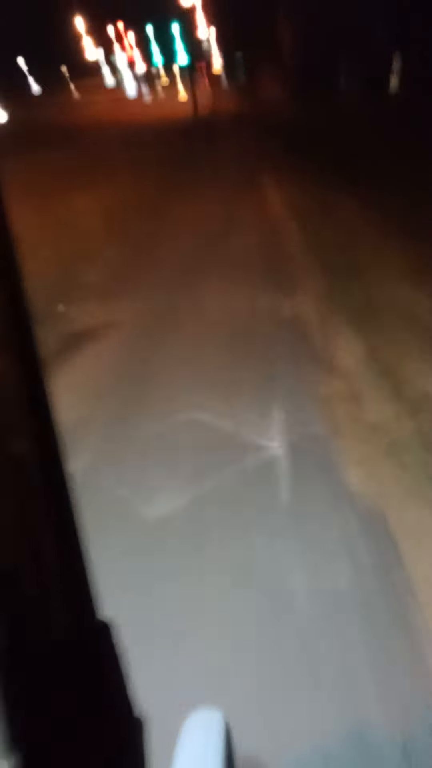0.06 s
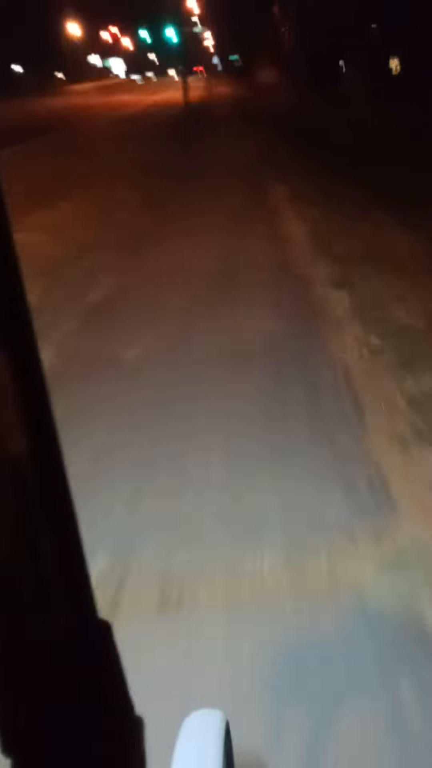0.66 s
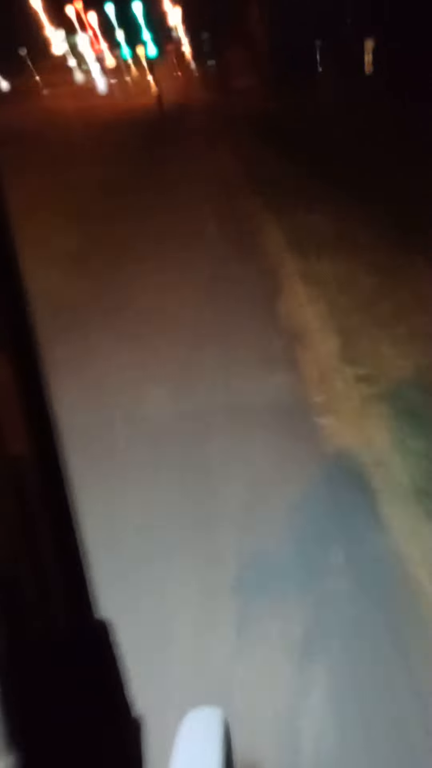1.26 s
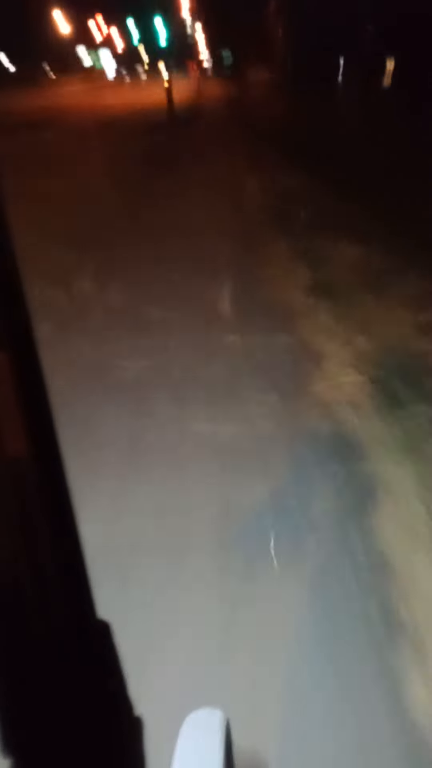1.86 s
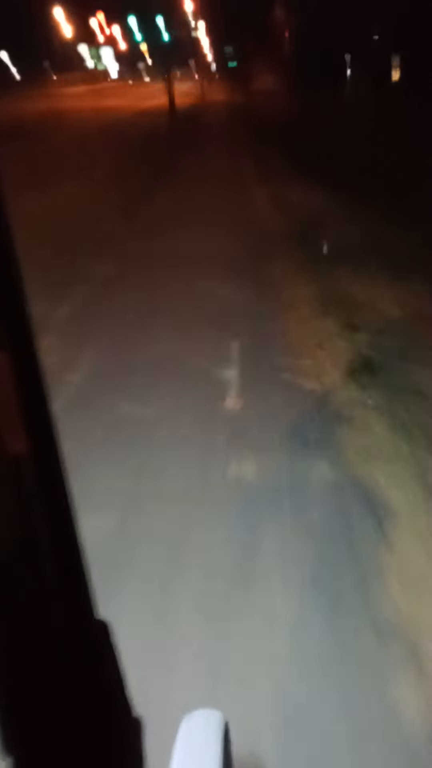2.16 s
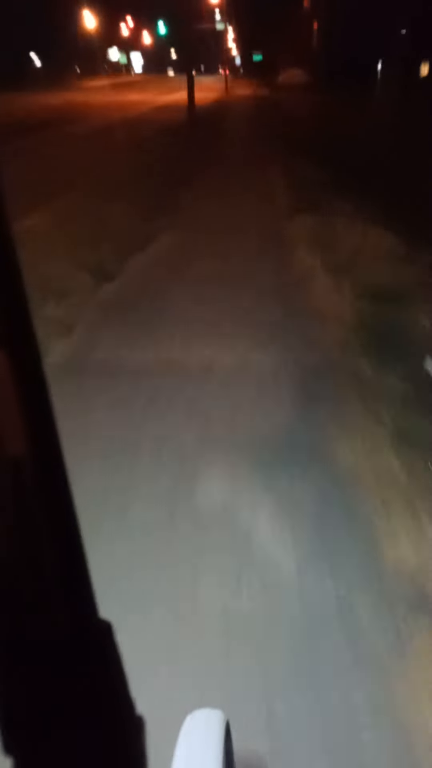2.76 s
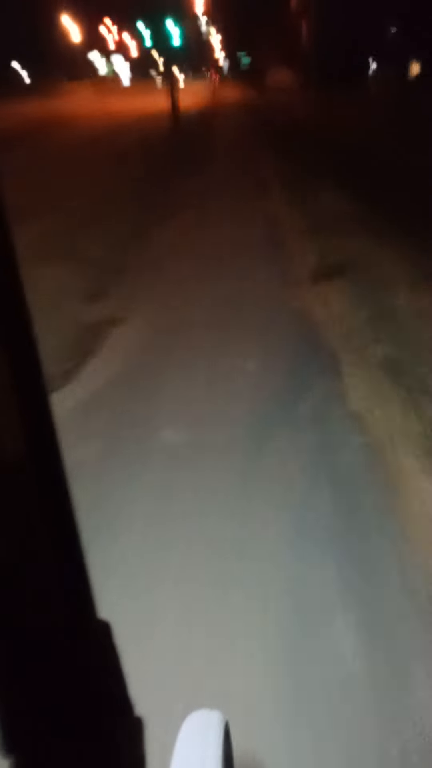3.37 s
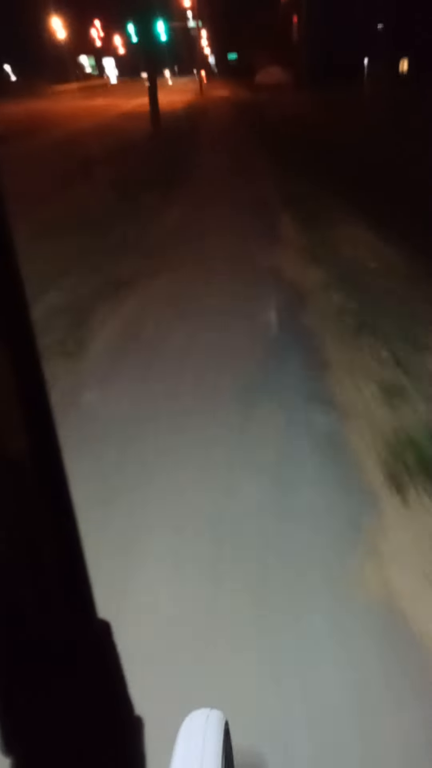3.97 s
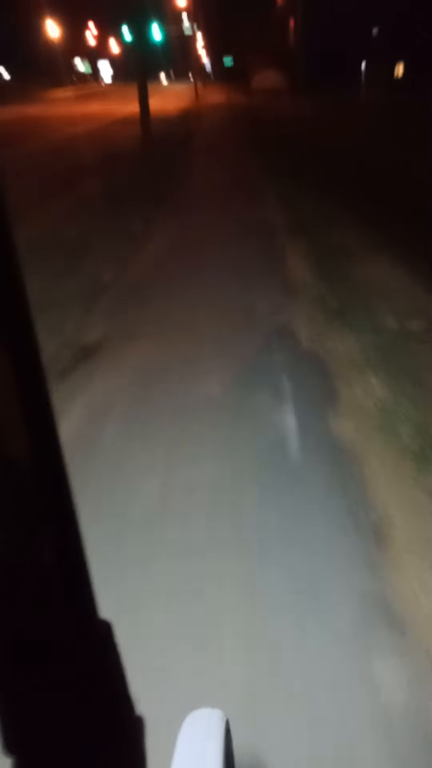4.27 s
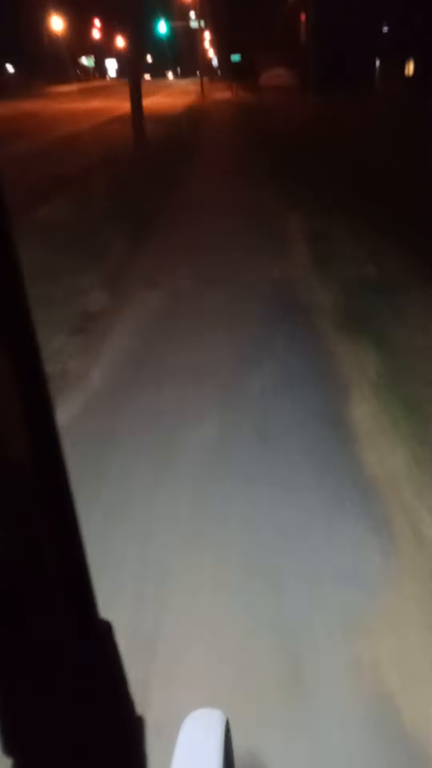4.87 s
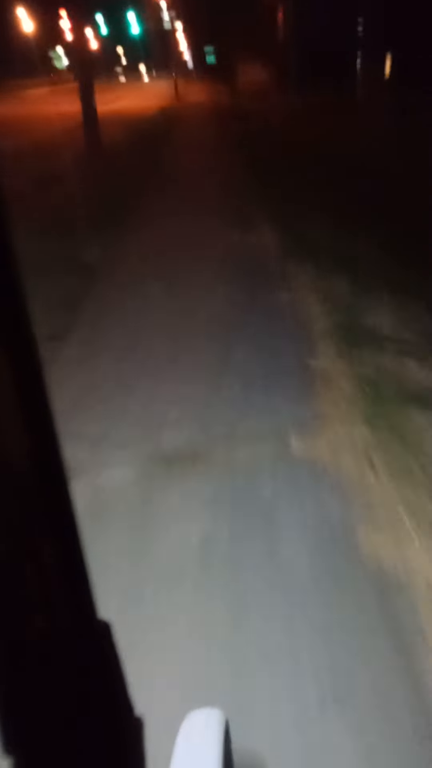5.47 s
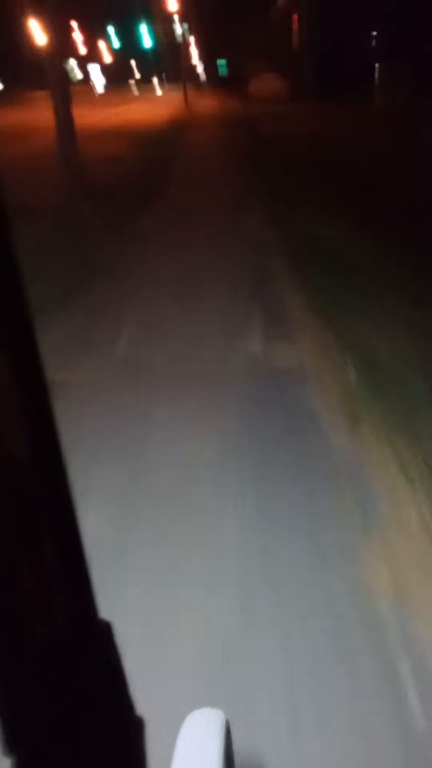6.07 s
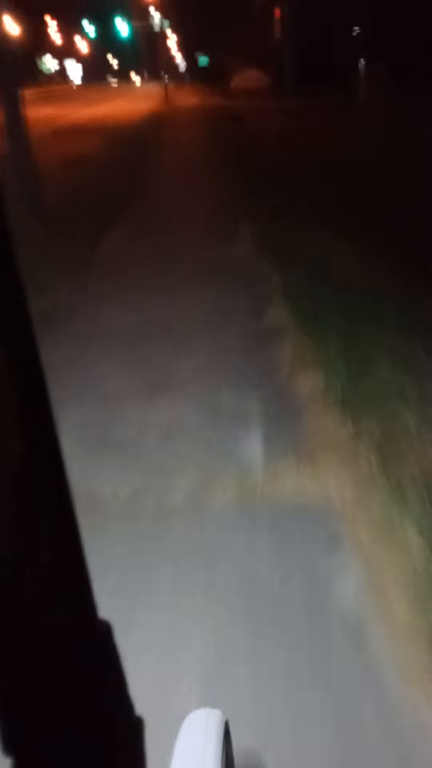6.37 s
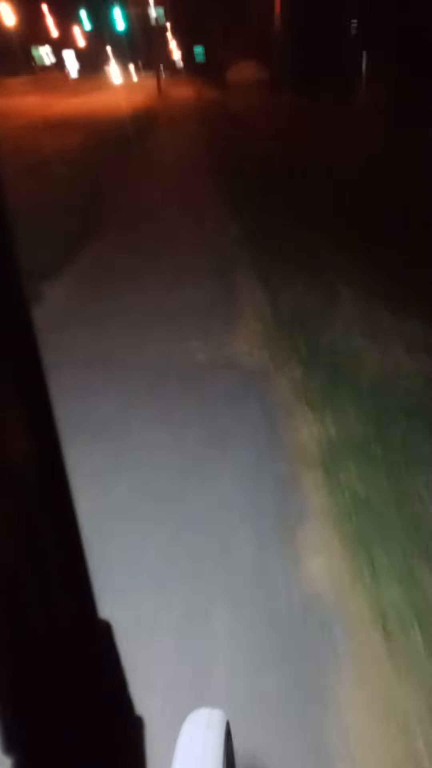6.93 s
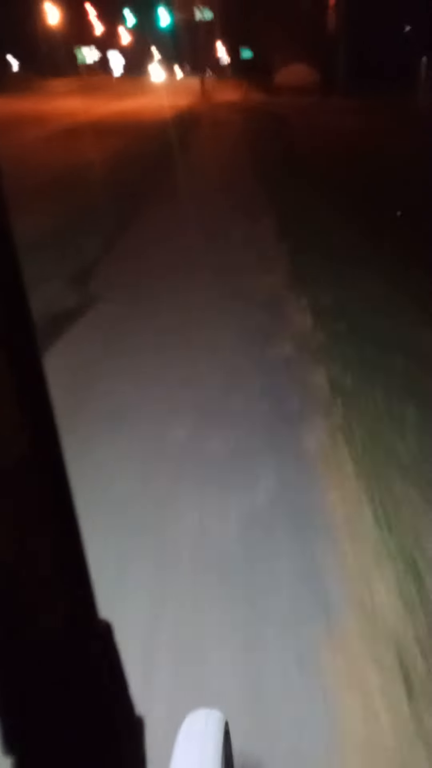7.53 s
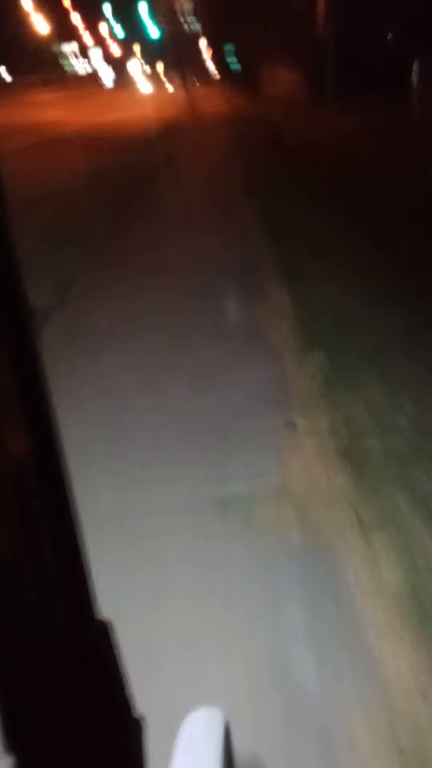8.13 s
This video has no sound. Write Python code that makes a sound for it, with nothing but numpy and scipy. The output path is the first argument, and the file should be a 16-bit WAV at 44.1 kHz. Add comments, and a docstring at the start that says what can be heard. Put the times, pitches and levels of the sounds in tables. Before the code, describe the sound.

Light metallic jingling, ticks and knocks from a moving bicycle, with one hard clack early on and passing cars that fade away.

```python
"""A bicycle rolls along a paved path beside a road at night, heard from the handlebar.
Its tyres rumble and thump over joints, the chain ticks, loose fittings tap, clink and knock,
a spring buzzes and a thin metal disc pings and shivers very high: each part rings in damped modes.
Cars pass and fade, their tyre roar combed by the bounce off the road.
One hard clack of the recorder in its holder makes a limiter duck everything briefly."""
import sys
import numpy as np
from scipy import signal
from scipy.fft import rfft, irfft
from scipy.io import wavfile
from scipy.ndimage import uniform_filter1d, minimum_filter1d

SR = 44100
rng = np.random.default_rng(int(sys.argv[2]) if len(sys.argv) > 2 else 0)


def wrap_up_sound(samples):
    """Save the sound to the file named by the first command line argument, as 16-bit audio."""
    columns = np.atleast_2d(samples).T
    # keep every value between -1 and 1, then stretch to whole-number steps
    tamed = np.clip(columns, -1, 1)
    steps = np.round(tamed * 32767).astype(np.int16)
    wavfile.write(sys.argv[1], SR, steps)


N = 361619
T = np.arange(N) / SR
LEAD_IN_SAMPLES = 256  # ahead of each hit
LEAD_IN_S = LEAD_IN_SAMPLES / SR


def undb(db):
    """Decibels to gain."""
    return 10 ** (np.asarray(db) / 20)


def unit(x):
    """Scale to rms 1."""
    return x / np.sqrt(np.mean(x ** 2))


def curves(rows):
    """Columns of a timed table, interpolated linearly."""
    times_s, *columns = np.transpose(rows)
    return [np.interp(T, times_s, column) for column in columns]


def add(out, time_s, x):
    """Mix x into out from time_s."""
    i = max(int(time_s * SR), 0)
    out[i:i + len(x)] += x[:max(N - i, 0)]


def walk(rate_hz):
    """Smooth random drift; rms 1."""
    step = max(int(SR / rate_hz), 1)
    stairs = np.repeat(rng.standard_normal(N // step + 1), step)
    return unit(uniform_filter1d(uniform_filter1d(stairs, step), step)[:N])


def hump(peak_s, width_s):
    """Gaussian swell to 1."""
    return np.exp(-((T - peak_s) / width_s) ** 2)


def colour(x, spectrum):
    """Shape x by (frequency [Hz], gain [dB]) points; rms 1."""
    hz, db = np.transpose(spectrum)
    bins_hz = np.maximum(np.fft.rfftfreq(N, 1 / SR), 1)
    gain = undb(np.interp(np.log(bins_hz), np.log(hz), db))
    return unit(irfft(rfft(x) * gain, N))


def ridge(centre_hz, width_hz):
    """Noise band with a moving centre; rms 1."""
    lowpass = signal.butter(2, width_hz / 2, fs=SR, output="sos")
    baseband = signal.sosfilt(lowpass, rng.standard_normal(N) + 1j * rng.standard_normal(N))
    return unit(np.real(baseband * np.exp(2j * np.pi * np.cumsum(centre_hz) / SR)))


def ring(modes, scatter_db, detune, weight_db=0, size=2048):
    """Damped modes of a part; each blow lands elsewhere and reweights them."""
    hz, width_hz, db = np.transpose(modes)[:, :, None]
    scatter, shift = rng.standard_normal((2, len(modes), 1))
    t = np.arange(size) / SR
    sign = (-1) ** np.arange(len(modes))[:, None]
    gain = sign * undb(db + weight_db + scatter_db * scatter) * np.sqrt(width_hz)
    decay = np.exp(-np.pi * width_hz * t)
    return np.sum(gain * decay * np.sin(2 * np.pi * hz * (1 + detune * shift) * t), axis=0)


def strike(body, buzz, buzz_s, lead_in=0.26, lead_in_rise_s=0.0021, size=2048):
    """A faint rising lead-in, the hit and a dying buzz; energy of 5 ms at rms 1."""
    t = (np.arange(size) - LEAD_IN_SAMPLES) / SR
    lead_in_noise = lead_in * np.exp(-np.abs(t) / lead_in_rise_s) / np.sqrt(SR * lead_in_rise_s)
    rebounds = buzz * np.exp(-np.abs(t) / buzz_s) / np.sqrt(SR * buzz_s)
    force = np.where(t < 0, lead_in_noise, rebounds) * rng.standard_normal(size) ** 3
    force[LEAD_IN_SAMPLES] = 1
    hit = signal.fftconvolve(force, body)
    return hit / np.sqrt(np.sum(hit ** 2) / (0.005 * SR))


# Bicycle tyre rumble (frequency [Hz], gain [dB])
RUMBLE_SPECTRUM = [(25, -34), (40, -15), (75, 0), (130, 0.5), (250, -9.5), (340, -10.5), (430, -20),
                   (720, -20.5), (1500, -39.5), (2500, -93)]
# Thumps over joints (time [s], pitch [Hz], half length [s], peak [dB])
THUMPS = [(0.079, 124, 0.0055, -25.5), (.386, 228, 0.003, -18.5), (1.427, 81.8, 0.014, -36.5),
          (4.019, 120.4, 0.014, -34.5)]


def tyres(fade_db_per_s=0.32):
    """Rolling rumble; joints send short, soft blows through the frame."""
    rumble_db = -47.5 - fade_db_per_s * T + 4.4 * np.tanh(walk(16))
    out = undb(rumble_db) * colour(rng.standard_normal(N), RUMBLE_SPECTRUM)
    for time_s, hz, half_s, db in THUMPS:
        envelope = np.exp(-np.abs((T - time_s) / half_s) ** 3.1)
        out += undb(db) * envelope * np.cos(2 * np.pi * hz * (T - time_s))
    return out


def road_bounce(x, spacing_hz, echo, wander=0.02, bounces=1, abreast_s=3.0, passing_s=2.3):
    """Reflections comb x; the ridges close to spacing_hz as the car nears, then spread."""
    distance = np.hypot(1, (T - abreast_s) / passing_s)  # 1 when abreast
    lag_s = (1 + wander * walk(2.94)) / (spacing_hz * distance)
    echoes = sum(echo ** k * np.interp(T - k * lag_s, T, x) for k in range(1, bounces + 1))
    return unit(x + echoes)


# Car tyre roar (time [s], relative level [dB])
ROAR_LEVELS = [(0, -48), (.5, -46.5), (2.3, -45.5), (3.7, -51.5), (5.3, -56), (6, -68.5), (8.2, -60.5)]
# Its spectrum (frequency [Hz], gain [dB])
ROAR_SPECTRUM = [(250, -2.5), (450, -5), (580, 1.5), (760, -8), (860, -4), (1120, 4.5), (1500, 5.5),
                 (1850, 4), (2200, -6.5), (3200, -22), (4100, -18.5), (10000, -48)]


def car_roar(gain_db=-2.5):
    """Broad, wavering tyre noise, faintly combed."""
    level_db, = curves(ROAR_LEVELS)
    envelope = undb(level_db + gain_db + 2.3 * walk(12))
    noise = colour(rng.standard_normal(N), ROAR_SPECTRUM)
    return envelope * road_bounce(noise, spacing_hz=417, echo=0.033)


def tread_whine(pitch_hz=1010, throb_hz=2.807, throb_db=7, end_s=2.39):
    """The tread of the approaching car throbs, fading out as it arrives."""
    swell_db = -52.5 + 5.5 * hump(peak_s=1.52, width_s=0.33)
    throb = np.cos(2 * np.pi * throb_hz * (T - 0.02))
    fade = np.clip(2 * (end_s - T), 0, 1)
    return undb(swell_db + throb_db * throb) * fade * ridge(pitch_hz + 22 * walk(16), width_hz=75)


# Lower band of car tyre noise (time [s], centre [Hz], level [dB])
LOWER_BAND = [(2.5, 791, -68), (2.9, 825, -44.5), (2.99, 862, -47.5), (3.1, 919, -39.5), (3.22, 932, -41.5),
              (3.42, 963, -49.5), (3.8, 1084, -50.5), (5.3, 1296, -86)]
# Upper band (time [s], centre [Hz], blur [Hz], level [dB])
UPPER_BAND = [(0, 1968, 52, -49), (.45, 1870, 74, -47), (.9, 1773, 228, -49.5), (2.2, 1276, 212, -57.5),
              (2.6, 1248, 18, -44), (2.8, 1250, 69, -48), (3.4, 1354, 205.4, -64), (4.05, 1395, 156, -51),
              (5.2, 1579, 176, -58), (6, 1654, 220, -80)]


def car_bands():
    """Two bands of tyre noise: the upper sinks as the car nears, both rise as it leaves."""
    lower_hz, lower_db = curves(LOWER_BAND)
    upper_hz, blur_hz, upper_db = curves(UPPER_BAND)
    lower = undb(lower_db + walk(20)) * ridge(lower_hz + 28 * walk(16), width_hz=156)
    upper = undb(upper_db + walk(13)) * ridge(upper_hz + blur_hz * walk(350), width_hz=61)
    return lower + upper


# Hiss of approaching cars (time [s], level [dB])
HISS_LEVELS = [(0, -62), (.45, -53.5), (1.6, -63.5), (2.4, -59.5), (3.6, -87)]


def car_hiss():
    """Deeply combed hiss reaches the path ahead of the car."""
    level_db, = curves(HISS_LEVELS)
    hiss = ridge(2600 + 260 * T, width_hz=1340)
    return undb(level_db) * road_bounce(hiss, spacing_hz=264.7, echo=0.77, wander=0.05, bounces=2)


# Thin ring of links and ticks (frequency [Hz], width [Hz], gain [dB])
TICK_MODES = [(7130, 1050, -11.5), (9570, 780, -6), (12030, 660, 0.5), (15100, 550, -9.5)]
# Grit under the tyres (frequency [Hz], gain [dB])
GRIT_SPECTRUM = [(1500, 8), (2500, 15), (4000, 4.5), (6400, 0.5), (7700, -11), (10000, 4.5), (13300, -4),
                 (15200, 5)]
# Shaking of the bicycle (time [s], level [dB])
SHAKE_LEVELS = [(0, -64.5), (1.9, -58.5), (3, -62.5), (8.2, -63)]


def chain_and_grit(links_per_s=30.6, links_gain_db=6, count=260):
    """Chain links tick unevenly over the teeth; grit crackles beneath."""
    shake_db, = curves(SHAKE_LEVELS)
    links = np.zeros(N)
    for k, (late, force) in enumerate(rng.standard_normal((count, 2))):
        body = ring(TICK_MODES, scatter_db=4, detune=0.04, size=1024)
        link = undb(4 * min(force, 1.5)) * strike(body, buzz=0.9, buzz_s=0.004)
        add(links, (k + 0.2 * late) / links_per_s, link)
    crackle = undb(2 * walk(300) + 3 * walk(70))
    grit = colour(rng.standard_normal(N) * crackle, GRIT_SPECTRUM)
    return undb(shake_db) * (undb(links_gain_db) * links + grit)


# Dull ring of a loose fitting (frequency [Hz], width [Hz], gain [dB])
FITTING_MODES = [(1300, 920, -5), (2060, 510, 10), (2766, 160, 5.5), (3280, 340, 5.5), (5590, 290, -1.5),
                 (7100, 190, -16), (10700, 390, -12.5)]
# Its tapping (time [s], level [dB])
TAP_LEVELS = [(0, -70), (2.8, -55), (8.2, -50.5)]


def taps(scatter_db=2.0, count=72):
    """A loose fitting taps lightly and unevenly, louder as the ride goes on."""
    out = np.zeros(N)
    for k, (late, force) in enumerate(rng.standard_normal((count, 2))):
        time_s = abs(k + 0.5 * late) / count * N / SR
        db = np.interp(time_s, *np.transpose(TAP_LEVELS)) + scatter_db * min(force, 2)
        body = ring(FITTING_MODES, scatter_db=2.5, detune=0.015, size=1024)
        add(out, time_s, undb(db) * strike(body, buzz=0.05, buzz_s=0.004, lead_in=0.03, size=1024))
    return out


# Small metal parts (frequency [Hz], width before damping factor [Hz], gain [dB])
SMALL_PART_MODES = [(2000, 100, 2), (2400, 120, -7), (3500, 280, 4.5), (3870, 290, 3), (4445, 170, 5),
                    (4770, 820, 5), (5390, 800, 5.5), (6160, 580, 5.5), (6740, 600, 0), (9460, 500, -4),
                    (10150, 290, -3), (14500, 2500, -4)]


def small_part(focus_hz, damping, focus_db=13, focus_octaves=0.14):
    """Ring with the modes near focus_hz favoured; a freer part is damped less."""
    modes = np.array(SMALL_PART_MODES) * [1, damping, 1]
    offset = np.log2(modes[:, :1] / focus_hz) / focus_octaves
    return ring(modes, scatter_db=4.5, detune=0.012, weight_db=focus_db * np.exp(-offset ** 2))


def jingle(level_db=-55, scatter_db=3, bounce_s=0.022, loss_db=3, low_hz=3300, count=100):
    """Small parts hop faintly: three bounces each, softer every time."""
    out = np.zeros(N)
    for k, (late, force, pitch, gap) in enumerate(rng.random((count, 4))):
        time_s = (k + late) / count * N / SR
        db = level_db + scatter_db * (2 * force - 1)
        for hop in range(3):
            body = small_part(low_hz * 2 ** (pitch ** 2), damping=0.4)
            add(out, time_s, undb(db - hop * loss_db) * strike(body, buzz=0.7, buzz_s=0.005, size=1024))
            time_s += bounce_s * (0.5 + gap)
    return out


# Clinks of small parts (time [s], relative level [dB], focus [Hz])
CLINKS = [(0.164, -42, 5700), (0.417, -45, 5800), (0.8187, -39, 6480), (1.1244, -38, 4070),
          (1.138, -39, 6400), (1.721, -35.5, 4600), (2.449, -37, 5090), (2.458, -35.5, 5100),
          (3.0337, -46, 5600), (3.698, -45.5, 4430), (4.442, -39, 5320), (4.9699, -39.5, 4960),
          (5.4556, -41.5, 4960), (5.4733, -43.5, 3400), (5.7612, -32.5, 3440), (6.097, -41, 3500),
          (6.128, -46, 6070), (6.44, -45, 3700), (6.7597, -38, 3620), (6.9902, -36.5, 6900),
          (7.0198, -40, 6200), (7.0478, -46, 6100), (7.0855, -38, 4250), (7.094, -37, 4840),
          (7.678, -44, 5750), (7.8437, -36.5, 3750), (7.8551, -36.5, 6800)]


def clinks(gain_db=2.75):
    """Small metal parts collide and buzz briefly."""
    out = np.zeros(N)
    for time_s, db, focus_hz in CLINKS:
        clink = strike(small_part(focus_hz, damping=0.58), buzz=0.19, buzz_s=0.012, lead_in=0.24)
        add(out, time_s - LEAD_IN_S, undb(db + gain_db) * clink)
    return out


def rattle(spells, modes, contacts_per_s, idle_db, contact_s=0.0015):
    """Random contacts in spells, faint between; soft ones ring the first mode, hard ones all."""
    swell = sum(undb(db) / (1 + ((T - mid_s) / half_s) ** 6) for mid_s, half_s, db in spells)
    swell += undb(idle_db) * np.maximum(walk(30) - 1, 0)
    hardness = np.sqrt(swell / swell.max())
    touching = rng.random(N) < contacts_per_s / SR
    t = T[:SR // 20]
    onset = 1 - np.exp(-(t / contact_s) ** 2)
    out, power = np.zeros(N), 0
    for k, (hz, width_hz, db) in enumerate(modes):
        envelope = undb(db) * np.sqrt(width_hz) * np.exp(-np.pi * width_hz * t) * onset
        body = envelope * np.sin(2 * np.pi * hz * t)
        force = swell * (hardness if k else 1) * touching * rng.standard_normal(N)
        out += signal.fftconvolve(force, body)[:N]
        power += np.sum(body ** 2) * contacts_per_s / SR
    return out / np.sqrt(power)


# Thin metal disc (frequency [Hz], width [Hz], gain [dB])
DISC_MODES = [(11690, 45, 0), (11850, 170, -4), (12395, 90, -4), (13310, 70, -18), (15060, 180, -9)]
# Blows on it (time [s], level [dB])
DISC_PINGS = [(.235, -41), (.8854, -43.5), (1.4856, -31.5), (1.5317, -30), (2.014, -44), (2.669, -29),
              (3.7741, -46), (4.4321, -45), (4.6405, -33.5), (4.9578, -37), (5.952, -36), (6.341, -29),
              (6.9284, -30), (7.5395, -41), (7.8433, -42), (7.967, -35)]
# Spells of shivering (middle [s], half length [s], level [dB])
DISC_SHIVERS = [(0.63, 0.062, -47), (1.499, 0.0067, -35), (1.553, 0.024, -34.5), (1.99, 0.038, -39),
                (2.25, 0.023, -50.5), (2.604, 0.014, -38), (2.66, 0.033, -46.5), (6.222, 0.03, -46),
                (6.3, 0.032, -42), (6.84, 0.053, -51), (6.943, 0.02, -38), (7.925, 0.013, -43.5)]


def disc():
    """The disc shivers against its neighbour; struck, it ticks and rings very high."""
    out = rattle(DISC_SHIVERS, DISC_MODES, contacts_per_s=900, idle_db=-53)
    for time_s, db in DISC_PINGS:
        body = ring(DISC_MODES, scatter_db=3, detune=0.002)
        ping = strike(body, buzz=0.46, buzz_s=0.0031, lead_in=0.032) + undb(-10) * tick()
        add(out, time_s - LEAD_IN_S, undb(db) * ping)
    return out


def tick():
    """One thin, buzzing contact."""
    return strike(ring(TICK_MODES, scatter_db=5, detune=0.02), buzz=0.43, buzz_s=0.0047, lead_in=0.24)


# Ticks of loose parts (time [s], relative level [dB])
TICKS = [(0.325, -48.5), (1.149, -33.5), (2.4551, -47), (3.174, -52.5), (3.305, -46.5), (3.6258, -41.5),
         (3.978, -47), (5.1, -50), (5.664, -51.5), (6.704, -52), (6.9905, -40), (7.004, -47), (7.2823, -45),
         (7.868, -36.5)]


def ticks(gain_db=5):
    """Loose parts touch with single bright ticks."""
    out = np.zeros(N)
    for time_s, db in TICKS:
        add(out, time_s - LEAD_IN_S, undb(db + gain_db) * tick())
    return out


# Knocks of the loose fitting (time [s], relative level [dB])
KNOCKS = [(0.44, -43), (1.001, -43.5), (3.3359, -46.5), (3.356, -52), (3.5808, -43), (3.858, -38.5),
          (4.1503, -41), (4.166, -45.5), (4.4702, -43.5), (5.1078, -47), (5.223, -49.5), (5.7618, -39),
          (5.8855, -46), (6.0746, -42), (6.216, -41.5), (7.013, -46), (7.2198, -46.5), (7.2344, -38.5),
          (7.519, -50.5), (7.7395, -47), (7.8138, -41), (7.867, -50), (7.878, -43)]


def knocks(gain_db=4):
    """The fitting knocks dully; its broad modes die fast."""
    out = np.zeros(N)
    for time_s, db in KNOCKS:
        body = ring(FITTING_MODES, scatter_db=2.0, detune=0.02)
        knock = strike(body, buzz=0.12, buzz_s=0.016, lead_in=0.041, lead_in_rise_s=0.0054)
        add(out, time_s - LEAD_IN_S, undb(db + gain_db) * knock)
    return out


# Light spring (frequency [Hz], width [Hz], gain [dB])
SPRING_MODES = [(4582, 160, 2.5), (4590, 230, 3), (5850, 560, 2)]
# Spells of buzzing (middle [s], half length [s], level [dB])
SPRING_BUZZES = [(1.1, 0.037, -49.5), (1.52, .08, -63.5), (1.8, 0.095, -54.5), (6.26, 0.042, -55)]


def spring():
    """A light spring buzzes over rough patches of path."""
    return rattle(SPRING_BUZZES, SPRING_MODES, contacts_per_s=330, idle_db=-54)


def holder_clack(scrape_db=-28, tilt_pivot_hz=1200):
    """Jolted, the recorder scrapes in its holder, hits the stop and rebounds twice, duller."""
    sliding = np.interp(T, [1.124, 1.126, 1.134, 1.146], [0, 0.95, 0.61, 0.0098])
    scrape_spectrum = [(200, -29), (600, 6.0), (1300, -0.5), (6000, -28), (13000, -14)]
    out = undb(scrape_db) * sliding * colour(rng.standard_normal(N), scrape_spectrum)
    # (frequency [Hz], width [Hz], gain [dB])
    case_modes = np.array([(633, 130, 1), (880, 170, 10), (1200, 370, 6.5),
                           (2570, 360, 7.5), (4580, 630, 0), (10000, 2500, -15)])
    octaves_off = np.abs(np.log2(case_modes[:, :1] / tilt_pivot_hz))
    for time_s, db, tilt_db_per_octave in [(1.1606, -7.5, 4), (1.1801, -9.5, -17), (1.1845, -14, -19)]:
        body = ring(case_modes, scatter_db=1, detune=0.01, weight_db=tilt_db_per_octave * octaves_off)
        add(out, time_s - LEAD_IN_S, undb(db) * strike(body, buzz=0.083, buzz_s=0.0085, lead_in=0.0058))
    # so small a case radiates no bass
    return signal.sosfilt(signal.butter(2, 450, "high", fs=SR, output="sos"), out)


def car_abreast(level_db=-52.5):
    """The low body of the roar, rising in pitch, heard only as the car goes by."""
    centre_hz = 420 + 220 * (T - 3.35)
    return undb(level_db) * hump(peak_s=3.39, width_s=0.4) * ridge(centre_hz, width_hz=120)


# Bicycle frame (frequency [Hz], width [Hz], gain [dB])
FRAME_MODE = (780, 1200, 0)
# Hard jolts (time [s], level [dB])
JOLTS = [(6.9774, -29.5), (7.84, -31.5)]


def jolts():
    """A rough knock rings fitting and frame together and shudders on."""
    out = np.zeros(N)
    for time_s, db in JOLTS:
        body = ring(FITTING_MODES[:4] + [FRAME_MODE], scatter_db=-0.5, detune=0.019)
        add(out, time_s - LEAD_IN_S, undb(db) * strike(body, buzz=0.51, buzz_s=0.028, lead_in=0.089))
    return out


def scene():
    """Mono mix at the handlebar, in open air."""
    impacts = knocks() + clinks() + ticks() + jolts() + taps() + holder_clack()
    rattles = chain_and_grit() + jingle() + disc() + spring()
    cars = car_roar() + tread_whine() + car_bands() + car_hiss() + car_abreast()
    return (impacts + rattles + cars + tyres())[None]


def record(dry, ceiling_db=-11.5, hold_s=0.036, release_s=0.023, cutoff_hz=15950):
    """Peak limiter with hold and release, then a steep low-pass."""
    x = dry[0]
    needed_gain = np.minimum(1, undb(ceiling_db) / (np.abs(x) + 1e-9))
    half_hold = int(hold_s * SR / 2)
    held_gain = minimum_filter1d(needed_gain, 2 * half_hold + 1, origin=half_hold)
    release = 1 / (release_s * SR)
    reduction = signal.lfilter([release], [1, release - 1], 1 - held_gain)
    gain = np.minimum(held_gain, 1 - reduction)
    lowpass = signal.ellip(10, 0.2, 80, cutoff_hz, fs=SR, output="sos")
    return signal.sosfilt(lowpass, x * gain)[None]


dry = scene()
out = record(dry)
wrap_up_sound(out)
```